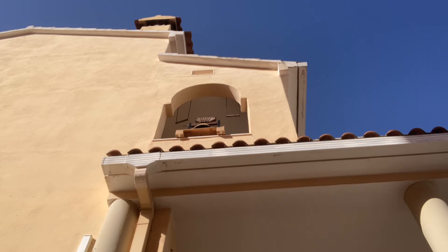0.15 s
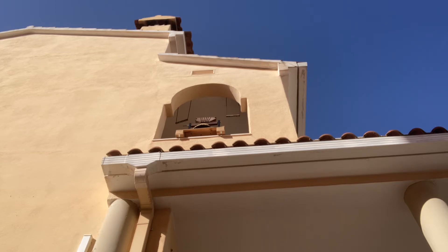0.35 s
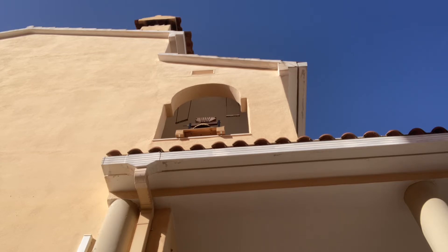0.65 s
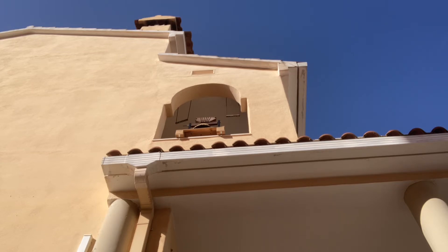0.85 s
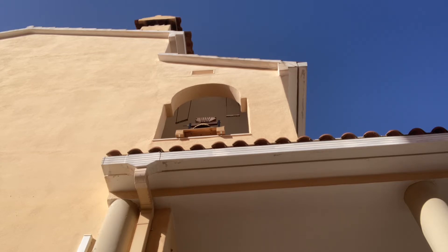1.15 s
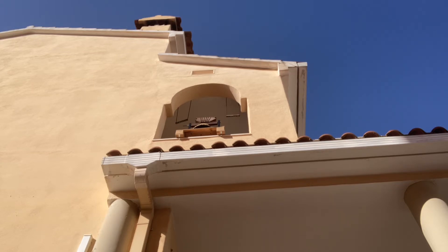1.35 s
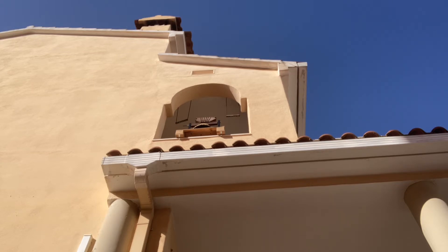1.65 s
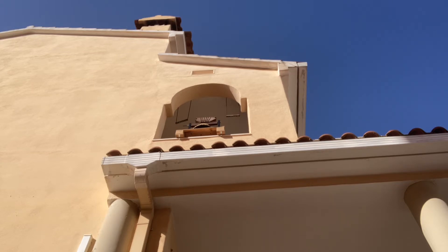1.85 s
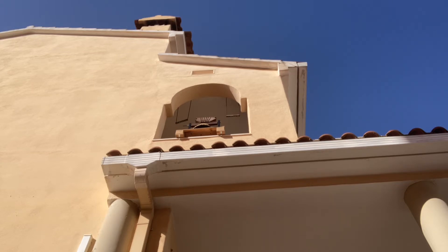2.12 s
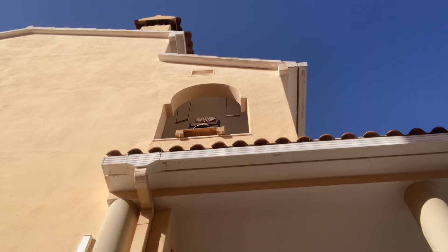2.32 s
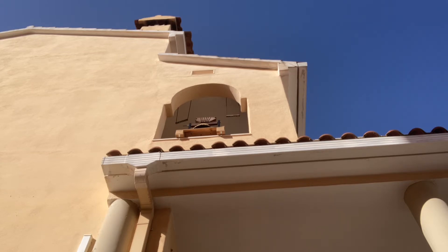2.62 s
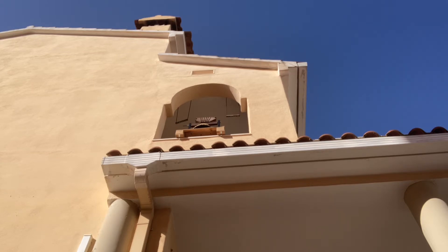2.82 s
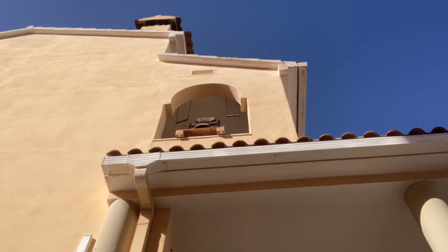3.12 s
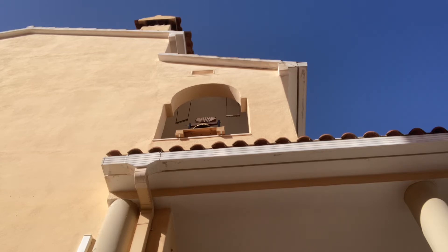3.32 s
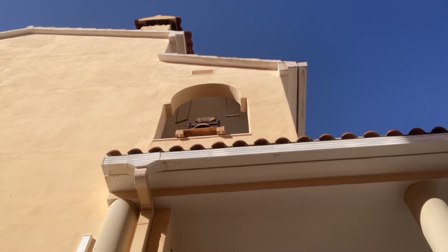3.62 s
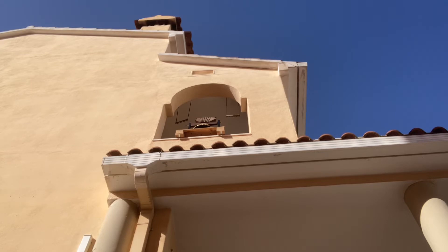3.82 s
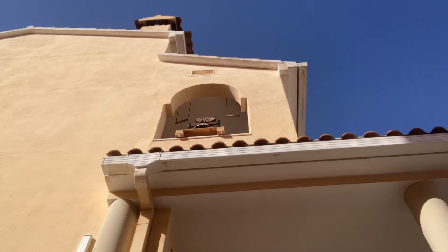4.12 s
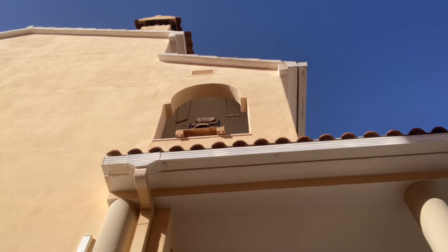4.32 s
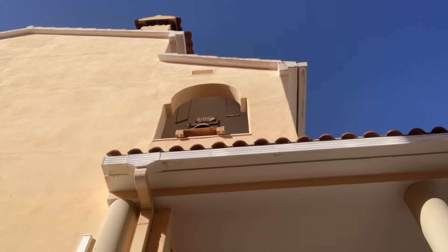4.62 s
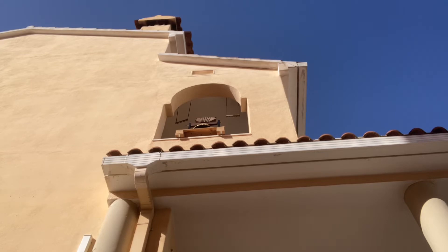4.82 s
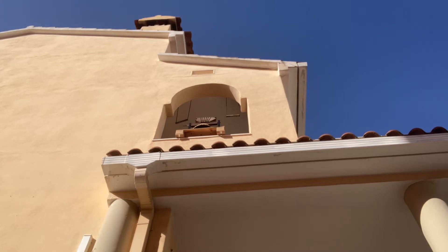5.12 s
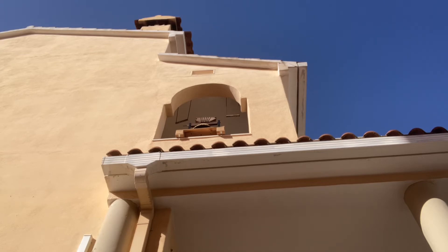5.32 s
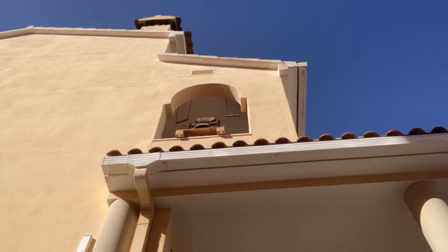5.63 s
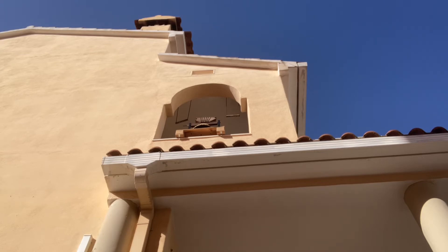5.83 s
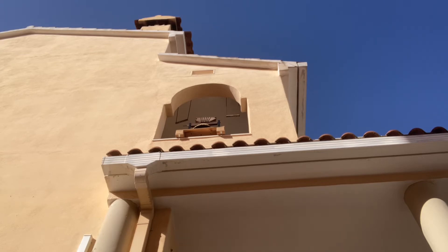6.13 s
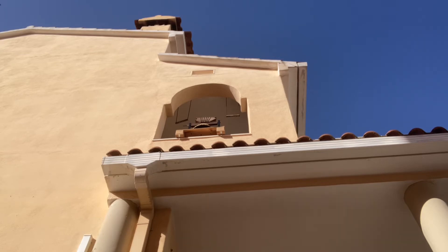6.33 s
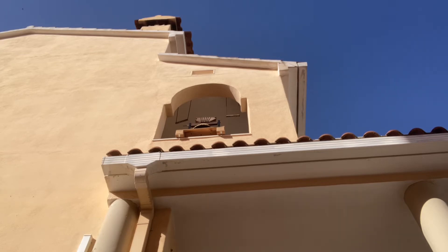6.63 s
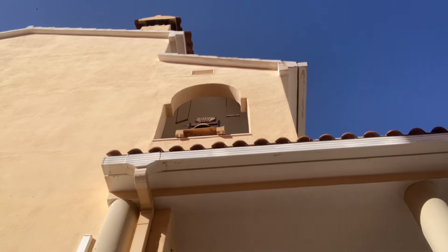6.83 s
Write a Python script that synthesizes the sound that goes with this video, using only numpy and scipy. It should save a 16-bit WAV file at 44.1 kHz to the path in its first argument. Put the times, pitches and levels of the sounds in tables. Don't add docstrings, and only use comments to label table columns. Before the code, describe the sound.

Outdoors, a small bell's tail fades, a single loud metallic stroke rings and dies, then echoing sparrow chirps continue over distant car brakes and soft rustling leaves.

```python
import sys
import numpy as np
from scipy import signal
from scipy.fft import rfft, irfft
from scipy.io import wavfile
from scipy.ndimage import uniform_filter1d

SR = 44100
rng = np.random.default_rng(int(sys.argv[2]) if len(sys.argv) > 2 else 0)


def voltage_ratio(decibels):
    exponent = np.asarray(decibels, float) / 20
    return 10 ** exponent


def put_to_file(sound):
    columns = np.atleast_2d(sound).T
    safe = np.clip(columns, -1, 1)
    whole_steps = np.round(safe * 32767)
    wavfile.write(sys.argv[1], SR, whole_steps.astype(np.int16))


N = 306936


def rms_one(x):
    return x / np.sqrt(np.mean(x ** 2) + 1e-20)


def at_hz(points, hz):
    curve_hz, values = np.transpose(points)
    return np.interp(np.log(hz), np.log(curve_hz), values)


def drift(rate):
    turns = rng.standard_normal(600)
    return np.interp(np.arange(N) / SR * rate, np.arange(600), turns) * 1.4


def bands(low_hz, size, lines_db=0):
    white = rng.standard_normal((2, size))
    if lines_db:
        line_gap_hz = 22
        place = np.fft.rfftfreq(size, 1 / SR) / line_gap_hz
        count = int(place[-1]) + 2
        comb = np.interp(place, np.arange(count), rng.standard_normal(count))
        white = rms_one(irfft(rfft(white) * voltage_ratio(lines_db * comb), size))
    edges = low_hz * 2 ** (np.arange(30) / 3)
    edges = edges[edges < 18000]
    for k, (low, high) in enumerate(zip(edges, edges[1:])):
        band = signal.butter(2, [low, high], "band", fs=SR, output="sos")
        yield np.sqrt(low * high), signal.sosfilt(band, white[k % 2])


def narrow(hz, width_hz, size=N):
    r = np.exp(-np.pi * width_hz / SR)
    poles = [1, -2 * r * np.cos(2 * np.pi * hz / SR), r * r]
    once = signal.lfilter([1], poles, rng.standard_normal(size))
    return rms_one(signal.lfilter([1, 0, -1], poles, once))


def bell():
    # (time [s], blow [dB], lift of the side partial [dB])
    strokes = [
        (-.68, -7, 14.5),
        (1.297, -1.3, 0),
    ]
    t = np.arange(2 * SR) / SR
    out = np.zeros(N + 3 * SR)
    for s, blow_db, side_db in strokes:
        at = round((s + 1) * SR)
        fade_out = np.minimum(4 * (2 - t), 1)
        out[at:at + 2 * SR] += voltage_ratio(blow_db) * (ring(t, side_db) + clang(t)) * fade_out
    return out[SR:SR + N]


def ring(t, side_db):
    partial_hz = [422.9, 488.4, 490.1, 848, 922.9, 986.7, 1009.2, 1141.1, 1228.6, 1260.9, 1320.4, 1559.5,
                  1605.4, 1789.6, 1879.8, 1927.9, 1967.6, 2079.6, 2157.9, 2236.8, 2672.8, 2718.9, 2856.7,
                  3123.3, 3301.1, 3565, 3774, 4009.2, 4480.1, 4687.8]
    # (height [dB], time to fall 60 dB [s])
    partial_ring = [(-48, 2.6), (-43, 3.6), (-50, 3.2), (-34, .86), (-32, 1.2), (-33, 1.02), (-36, .9),
                    (-49, 1.15), (-28.5, .64), (-33, .66), (-30.5, .74), (-42, .85), (-49, 1.02),
                    (-36, .52), (-30, .55), (-26, .68), (-33, .7), (-46, .65), (-38, .6), (-40, .55),
                    (-34, .3), (-42, .5), (-35.5, .45), (-28, .3), (-33, .4), (-38, .42), (-34, .4),
                    (-36, .32), (-29, .33), (-35, .36)]
    # (pitch [Hz], height [dB], time to fall 60 dB [s])
    brief = [(423, -36.5, .5), (490, -26.5, 0.22), (665, -37.5, 0.33), (3294, -37.5, .24),
             (3830, -28.5, 0.29), (4280, -42, 0.37), (4500, -36.5, 0.65), (4920, -42.5, .28),
             (5550, -34, 0.2), (6100, -35.5, .39), (6030, -33.5, .25), (6700, -38.5, .18),
             (7284, -39.5, .18), (8800, -40.5, 0.3), (9249, -39, .26), (9609, -37.5, 0.33),
             (10900, -37, 0.26)]
    # (pitch [Hz], height [dB], time to fall 60 dB [s])
    twins = [(1825, -45, .75), (1853, -44, .7), (1894, -41, .65), (2270, -45, .6), (3157, -35, .4),
             (3843, -40, .3), (4142, -43, .4), (4407, -40, .3), (4529, -38, .4)]
    build_up_s = .012
    side_hz = 1141.1
    out = np.zeros(len(t))
    for hz, (mode_db, t60), turn in zip(partial_hz, partial_ring, rng.random(len(partial_hz))):
        start = 2 * np.pi * turn * (hz > 500)
        build = 1 - np.exp(-t * hz / 1000 / build_up_s)
        fall = voltage_ratio(-60 * t / t60) + voltage_ratio(-28.5 - 60 * t / t60 / 2.6)
        height = voltage_ratio(mode_db + side_db * (hz == side_hz))
        out += build * height * fall * np.sin(2 * np.pi * hz * t + start)
    for (hz, mode_db, t60), turn in zip(brief, rng.random(len(brief))):
        build = np.minimum(t * hz / 4, 1)
        out += build * voltage_ratio(mode_db - 60 * t / t60) * np.sin(2 * np.pi * (hz * t + turn))
    for hz, mode_db, t60 in twins:
        build = 1 - np.exp(-t / build_up_s)
        out += build * voltage_ratio(mode_db - 60 * t / t60) * np.sin(2 * np.pi * hz * t)
    return out


def clang(t):
    # (frequency [Hz], level [dB per Hz])
    colour = [(180, -47.5), (300, -14.5), (480, -12.5), (650, -6.5), (1050, -19.5), (1300, -8.5),
              (1600, -14.5), (2300, -13.5), (3200, -8.5), (4600, -10.5), (7000, -12.5), (9800, -9.5),
              (12500, -19), (15500, -28)]
    # (frequency [Hz], time to fall 60 dB [s])
    lasting = [(250, 0.27), (480, 0.11), (700, 0.75), (1200, 0.69), (2500, 0.83), (4200, 0.68), (6000, 0.5),
               (9000, 0.47), (15000, 0.38)]
    crack = voltage_ratio(-20.5 - 60 * t / .17)
    out = np.zeros(len(t))
    for hz, noise in bands(220, len(t), lines_db=4.0):
        fade = voltage_ratio(-29.5 - 60 * t / at_hz(lasting, hz)) + crack
        out += voltage_ratio(at_hz(colour, hz)) * fade * noise
    out = knots(6.0 * out * np.minimum(t / .0002, 1))
    lag = round(.031 * SR)
    dull = signal.butter(2, 5900, fs=SR)
    out[lag:] += voltage_ratio(-4) * signal.lfilter(*dull, out[:-lag])
    return out


def knots(x):
    # (frequency [Hz], width [Hz], level [dB])
    clusters = [(4970, 30, -5), (5000, 36, -9), (5700, 240, 2), (6230, 26, 1), (7800, 150, -8),
                (8360, 43, -11.5), (8670, 130, -7), (9600, 47, 1), (10000, 79, -7.5)]
    hz = np.fft.rfftfreq(len(x), 1 / SR)
    gain = voltage_ratio(-3 * np.clip((hz - 4400) / 600, 0, 1)).astype(complex)
    for top_hz, width_hz, db in clusters:
        gain += voltage_ratio(0.5 + db / 2) / (1 + 2j * (hz - top_hz) / max(width_hz, 60))
    return irfft(rfft(x) * gain, len(x))


def hammer():
    # (time [s], level [dB])
    swing = [(1.231, -85), (1.2335, -56), (1.26, -60), (1.292, -57), (1.3, -80)]
    # (frequency [Hz], width [Hz], level [dB])
    modes = [(1270, 200, -2), (1816, 250, -9), (2800, 900, -9), (4100, 300, 0), (5376, 300, -13),
             (6300, 700, -12), (8500, 1300, -5), (10400, 1300, -2)]
    size = SR // 4
    scrape = rms_one(sum(voltage_ratio(db) * narrow(hz, width_hz, size) for hz, width_hz, db in modes))
    out, at = np.zeros(N), round(swing[0][0] * SR)
    t = (at + np.arange(size)) / SR
    out[at:at + size] = scrape * voltage_ratio(np.interp(t, *np.transpose(swing), right=-120))
    return out


def birds():
    direct, echo = np.zeros((2, N + SR))
    for s, hz, shape, direct_db, echo_db in sparrow_calls() + street_calls() + thin_calls():
        t = np.arange(len(hz)) / SR
        bend, shake, flutter = [wobble(t, rate, 60) for rate in (50, 350, 220)]
        rasp = wobble(t, 1500, 240)
        shake_share = .012 if direct_db > -61 else .025
        phase = 2 * np.pi * np.cumsum(hz * (1 + .01 * bend + shake_share * shake)) / SR
        voice = np.sin(phase) + voltage_ratio(-28) * np.sin(2 * phase)
        tone = np.sqrt(2) * voltage_ratio(3 * flutter) * voice
        spread = shape ** .6 * np.minimum(hz / 4100, 1.1) ** .9
        at = round(s * SR) + SR // 2
        direct[at:at + len(t)] += voltage_ratio(direct_db) * shape * tone * (1 + .28 * rasp)
        echo[at:at + len(t)] += voltage_ratio(echo_db) * spread * tone * (1 + .45 * rasp)
    return (direct + yard(echo))[SR // 2:SR // 2 + N]


def wobble(t, rate, count):
    return np.interp(t * rate, np.arange(count), rng.standard_normal(count))


def sparrow_calls():
    # (time [s], length [s], pitch factor, direct level [dB], echo level [dB])
    chirps = [(.623, .124, .965, -64, -65.5), (2.057, .124, 1.0, -57, -61), (2.69, .1, 1.03, -58, -56.5),
              (2.785, .085, 1.03, -61, -57), (2.822, .12, .955, -58, -62), (4.01, .1, .95, -64, -58),
              (4.065, .112, .935, -54, -57), (4.43, .115, 1.0, -70, -62.5), (4.974, .11, .96, -63, -57),
              (5.057, .098, .99, -53, -57), (5.122, .097, .96, -55, -59), (6.033, .1, .99, -52.5, -57),
              (6.098, .097, .96, -58, -59)]
    # (time [s], length [s], pitch factor, echo level [dB])
    hidden = [(-.03, 0.084, 1.03, -69.5), (0.96, 0.074, 1, -78), (2.609, 0.13, 0.94, -59.5),
              (3.724, 0.12, 0.97, -68), (3.918, 0.1, 0.99, -54.5), (4.686, 0.085, 1.05, -64.5),
              (5.248, .12, 0.99, -63.5), (5.681, 0.11, 1, -66.5), (5.939, 0.11, .99, -55),
              (6.26, 0.14, 1.07, -60), (6.333, 0.12, 0.97, -65), (6.678, 0.093, 1.08, -70.5)]
    # (from [s], to [s])
    sharp_spans = [
        (-1, 2.65),
        (2.82, 3.9),
    ]
    # (share of the length, pitch [Hz], level [dB])
    sharp_notes = [
        [(0, 3900, -24), (.06, 4200, 0), (.18, 5000, 1), (.24, 4300, 2), (.33, 3600, -1), (.41, 3500, -4),
         (.45, 3450, -30)],
        [(.47, 3450, -30), (.51, 3500, -2), (.6, 3700, 2), (.67, 4400, 3), (.73, 3600, 0), (.83, 3100, -8),
         (1, 2650, -20)],
    ]
    # (share of the length, pitch [Hz], level [dB])
    round_notes = [
        [(0, 3700, -12), (.12, 4450, -1), (.25, 4550, 0), (.33, 4100, -1), (.42, 3500, 0), (.47, 3400, -30)],
        [(.53, 3150, -30), (.6, 3450, -3), (.7, 4000, -1), (.77, 3350, 0), (.86, 3080, -4), (1, 2700, -18)],
    ]
    calls = []
    unseen = [(s, length, factor, -120, echo_db) for s, length, factor, echo_db in hidden]
    for s, length, factor, direct_db, echo_db in chirps + unseen:
        sharp = any(a <= s < b for a, b in sharp_spans)
        hz, shape = chirp(length, sharp_notes if sharp else round_notes)
        calls.append((s, hz * factor, shape, direct_db, echo_db))
    return calls


def chirp(length, notes):
    share = np.arange(round(length * SR)) / (length * SR)
    at, pitch_hz, db = np.transpose(notes[0] + notes[1])
    hz = uniform_filter1d(np.interp(share, at, pitch_hz), size=90, mode="nearest")
    return hz, voltage_ratio(np.interp(share, at, db))


def street_calls():
    # (time [s], length [s], top pitch [Hz], echo level [dB])
    far_notes = [(0.123, 0.045, 4580, -76), (0.196, 0.091, 4720, -80), (0.299, 0.033, 4500, -79),
                 (0.901, 0.058, 5800, -78), (0.965, 0.025, 5090, -71), (0.992, 0.027, 4850, -73),
                 (1.12, 0.029, 4500, -80), (2.37, 0.039, 4520, -80), (3.142, 0.035, 4724, -65),
                 (3.302, 0.056, 4600, -71.5), (4.235, 0.091, 4460, -65.5), (4.41, 0.04, 5700, -67),
                 (4.421, 0.084, 4810, -58.5), (4.49, .05, 4770, -64.5), (4.6, 0.1, 4480, -71.5),
                 (4.838, 0.045, 4600, -68.5), (5.405, 0.059, 4300, -75), (5.598, 0.057, 4440, -72),
                 (5.831, 0.054, 4630, -73), (6.529, 0.067, 4630, -66.5), (6.802, 0.037, 4530, -73),
                 (2.658, 0.055, 5830, -68), (2.705, 0.051, 6160, -71), (3.91, 0.045, 5480, -73.5),
                 (4.998, 0.1, 5590, -74), (5.99, 0.084, 5410, -78.5), (5.626, 0.091, 3560, -69.5),
                 (6.548, 0.15, 3480, -76.5)]
    top_at = .36
    calls = []
    for s, length, top_hz, echo_db in far_notes:
        u = np.arange(round(length * SR)) / (length * SR)
        from_top = np.where(u < top_at, 1 - u / top_at, (u - top_at) / (1 - top_at))
        from_top = np.clip(from_top, 0, 1)
        hz = top_hz * (1 - .13 * from_top ** 1.88)
        calls.append((s, hz, np.sin(np.pi * u) ** .5, -120, echo_db))
    return calls


def thin_calls():
    # (time [s], length [s], start pitch [Hz], end pitch [Hz], level [dB])
    peeps = [(.47, 0.033, 3850, 3870, -77), (0.749, .008, 5600, 6500, -64),
             (0.864, 0.0091, 5450, 5960, -61.5), (0.928, 0.007, 5000, 6000, -66),
             (1.027, 0.023, 5620, 5800, -66.5), (1.279, 0.022, 5260, 5460, -51.5),
             (2.013, 0.041, 3720, 3830, -66), (2.223, 0.043, 6540, 6500, -73),
             (5.057, 0.064, 8420, 8800, -69), (2.935, 0.028, 6520, 6480, -72),
             (3.592, 0.083, 6440, 5700, -74), (3.719, 0.031, 6300, 5700, -71.5),
             (3.976, 0.019, 6200, 6350, -63.5), (3.997, .014, 5920, 6250, -64),
             (4.044, 0.024, 5300, 5950, -58), (4.035, .02, 6200, 6400, -64), (4.057, 0.04, 6820, 8800, -73),
             (5.023, 0.035, 6400, 6100, -66), (5.096, 0.03, 5600, 5860, -66),
             (5.087, 0.021, 6460, 6450, -63), (6.002, 0.029, 6260, 5800, -66),
             (6.074, .014, 5550, 5930, -58.5), (6.338, 0.0082, 6370, 5400, -66.5)]
    calls = []
    for s, length, from_hz, to_hz, db in peeps:
        u = np.arange(round(length * SR)) / (length * SR)
        hz = from_hz + (to_hz - from_hz) * u
        calls.append((s, hz, np.sin(np.pi * u) ** .5, db - 4.0, db - 10))
    return calls


def yard(x):
    t = np.arange(SR) / SR
    hits = rng.random(SR) < .02 + 1.5 * t
    near = hits * voltage_ratio(-60 * t / .36) / np.sqrt(np.minimum(.04 + 4.5 * t, 1))
    street = voltage_ratio(-11.5 - 60 * t / 1.05)
    bright, dull = rng.standard_normal((2, SR))
    dull = signal.sosfilt(signal.butter(2, 5400, fs=SR, output="sos"), dull)
    cloud = (bright * near + dull * street) * np.minimum(t / .01, 1)
    return signal.fftconvolve(x, cloud / np.sqrt(np.sum(cloud ** 2)))[:len(x)]


def brakes():
    # (time [s], length [s], pitch [Hz], width [Hz], level [dB])
    squeals = [
        (2.1, 1.0, 1800, 197, -74),
        (2.69, .45, 2430, 80, -67),
        (2.8, .75, 2205, 60, -68),
        (3.15, 1.6, 2990, 200, -70),
        (3.47, 1.0, 2393, 42, -65.5),
        (2.85, 1.7, 1480, 150, -70.5),
        (5.45, .6, 928, 25, -72),
        (3.72, .6, 67.5, 14, -58.5),
        (2.27, .12, 70, 25, -62),
        (4.72, .16, 440, 200, -62),
    ]
    t, out = np.arange(N) / SR, np.zeros(N)
    for s, length, hz, width_hz, level_db in squeals:
        wander_hz = hz + 0.229 * width_hz * drift(8.7)
        tone = np.sqrt(2) * np.sin(2 * np.pi * np.cumsum(wander_hz) / SR)
        pure = np.clip(1 - width_hz / 120, 0, 1)
        squeal = pure * tone + (1 - pure) * narrow(hz, 2.6 * width_hz)
        swell = np.interp((t - s) / length, [0, 0.27, 1], [0, 1, 0]) ** .5
        out += voltage_ratio(level_db + 3.0 * drift(23.93)) * swell * squeal
    return out


def leaves():
    # (frequency [Hz], level [dB per Hz])
    colour = [(5000, -30), (7000, -19), (8400, -13), (10000, -5), (11300, 0), (12800, -5), (14200, -13),
              (15600, -23)]
    # (time [s], hold [s], level [dB])
    gusts = [(.08, .25, -89), (.58, .03, -86), (.7, .03, -86), (1.12, .1, -88), (2.1, .12, -84),
             (2.7, .14, -81), (2.94, .03, -86), (3.4, .4, -86), (3.97, .14, -78), (4.26, .05, -72),
             (4.55, .1, -81), (4.74, .08, -74), (4.91, .07, -68), (5.09, .08, -73), (5.37, .03, -72),
             (5.6, .2, -80), (6.0, .14, -78), (6.52, .25, -79), (6.86, .03, -81)]
    t = np.arange(N) / SR
    rustle = rms_one(sum(voltage_ratio(at_hz(colour, hz) + 1.5 * drift(18)) * noise for hz, noise in bands(5500, N)))
    level = voltage_ratio(-84)
    for s, hold, db in gusts:
        swell = np.interp(t - s, [-.09, 0, hold, hold + .13], [0, 1, 1, 0]) ** 2
        level = level + voltage_ratio(db) * swell
    return rustle * level * voltage_ratio(0.5 + 1.1 * drift(59))


def porch_swell():
    # (loudest time [s], half width [s], lift [dB])
    puffs = [
        (0.302, 0.24, 7.5),
        (.75, 0.11, 6.5),
        (1.1, 0.12, 7.5),
        (2.381, 0.22, 3),
        (3.5, 0.92, -2.5),
        (5.04, 0.13, 13),
        (5.699, 0.16, 8.5),
        (6.38, 0.19, 10.5),
        (6.849, 0.15, -1.5),
    ]
    t = np.arange(N) / SR
    return sum(lift_db * np.exp(-((t - s) / half) ** 2) for s, half, lift_db in puffs)


def porch(swell_db):
    return voltage_ratio(-56.5 + swell_db + 1.1 * drift(25)) * narrow(243.2, 62.6)


def traffic(swell_db):
    # (frequency [Hz], level [dB per Hz])
    colour = [(30, -56), (48, -51.5), (65, -18.5), (129, -22), (166, -12), (256, -19), (339, -18),
              (498, -24), (600, -32.5), (1220, -36), (2500, -45.5), (6000, -44.5), (11500, -47.5),
              (15600, -53)]
    # (time [s], tyre roar [dB])
    passing = [
        (0, -3),
        (.26, -10),
        (1.95, -6.5),
        (2.4, -5.5),
        (3.3, 1.5),
        (4.07, 7),
        (4.7, 6),
        (5.6, 4),
        (6.96, 0),
    ]
    home_hz = [75, 230, 1100, 4000]
    trim_db = [6, 4, 7.5]
    t, out = np.arange(N) / SR, np.zeros(N)
    tyres_db = np.interp(t, *np.transpose(passing))
    engine_db = 0.27 * tyres_db + drift(2.2)
    change = np.array([engine_db + trim_db[0], 0.29 * swell_db + trim_db[1], tyres_db + trim_db[2], 0 * t])
    for hz, noise in bands(31.25, N):
        shares = [np.interp(np.log(hz), np.log(home_hz), one) for one in np.eye(4)]
        flicker_db = 2.5 / (1 + (hz / 3500) ** 2) * drift(8.2)
        out += noise * voltage_ratio(at_hz(colour, hz) + shares @ change + flicker_db)
    return voltage_ratio(-27) * out


def scene():
    swell_db = porch_swell()
    near = bell() + hammer() + birds()
    far = brakes() + leaves() + porch(swell_db) + traffic(swell_db)
    return (near + far)[None]


def band_limit(x):
    return signal.sosfilt(signal.butter(12, 15750, fs=SR, output="sos"), x)


def record(dry):
    thin = signal.sosfilt(signal.butter(6, 54, "high", fs=SR, output="sos"), dry)
    limited = .5 * np.tanh(thin / .5)
    return band_limit(limited)


dry = scene()
out = record(dry)
put_to_file(out)
```